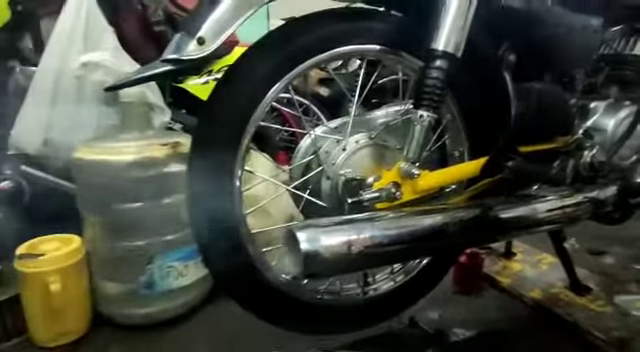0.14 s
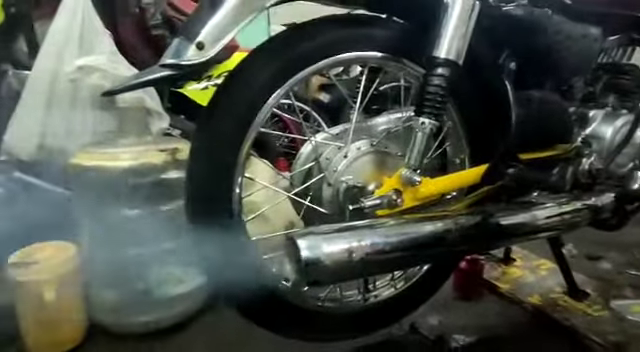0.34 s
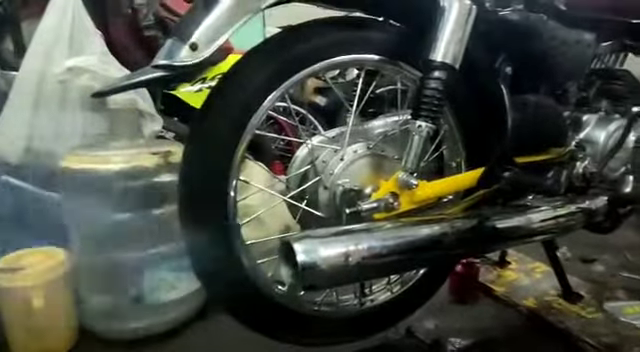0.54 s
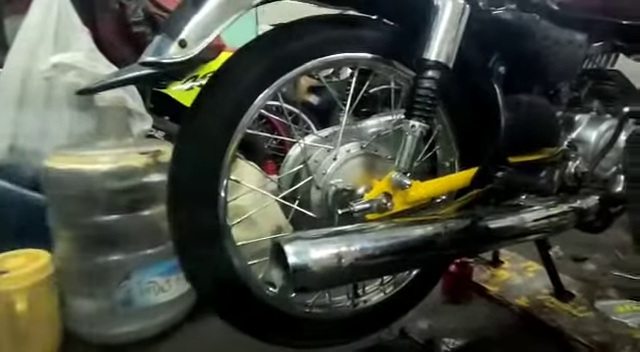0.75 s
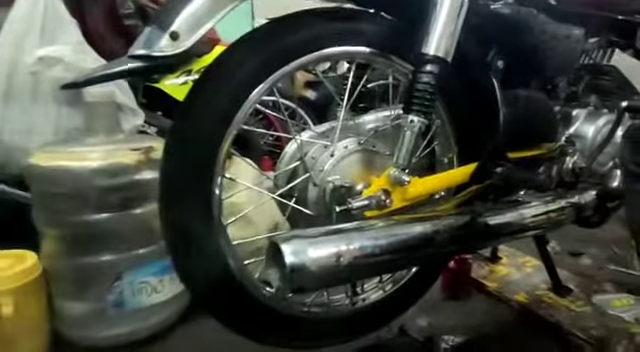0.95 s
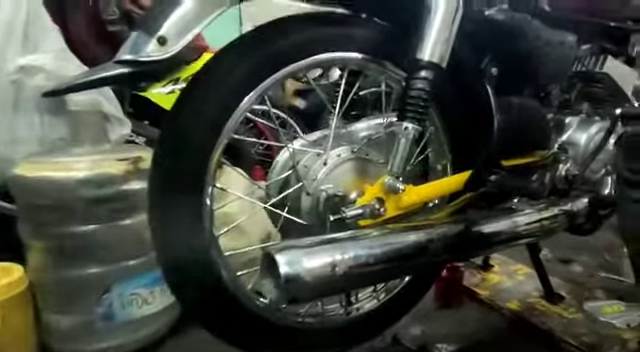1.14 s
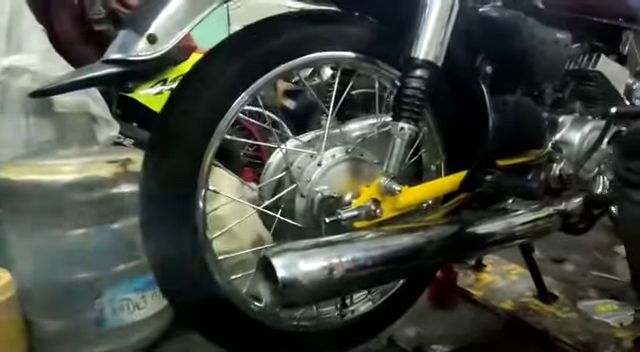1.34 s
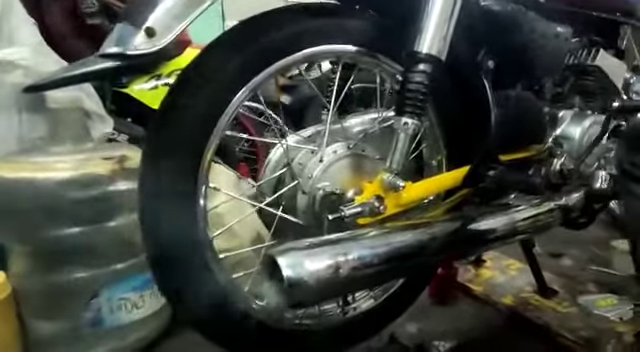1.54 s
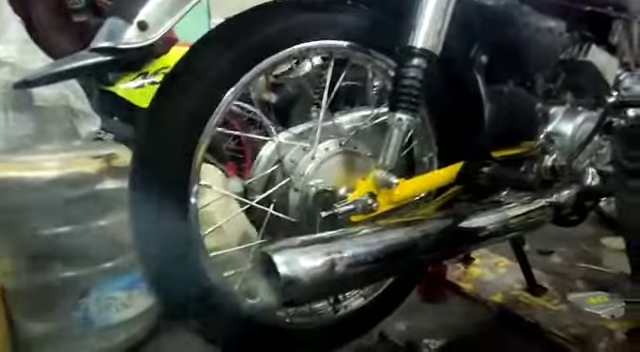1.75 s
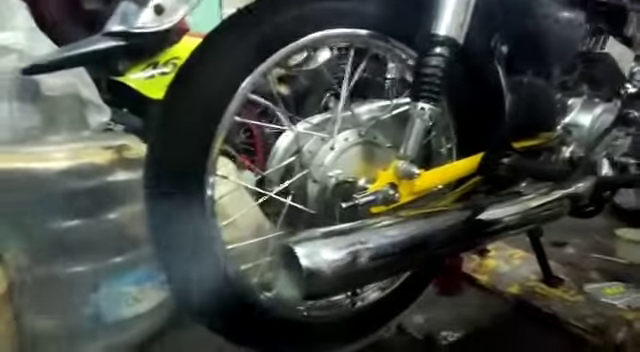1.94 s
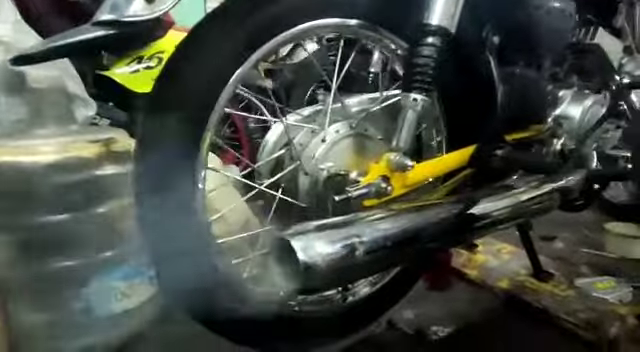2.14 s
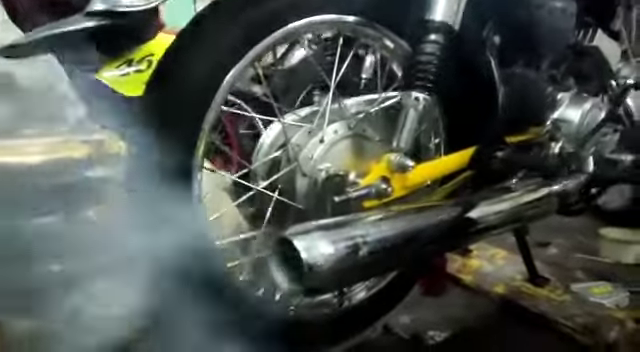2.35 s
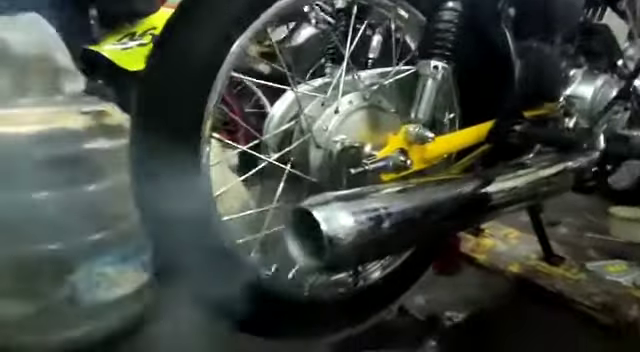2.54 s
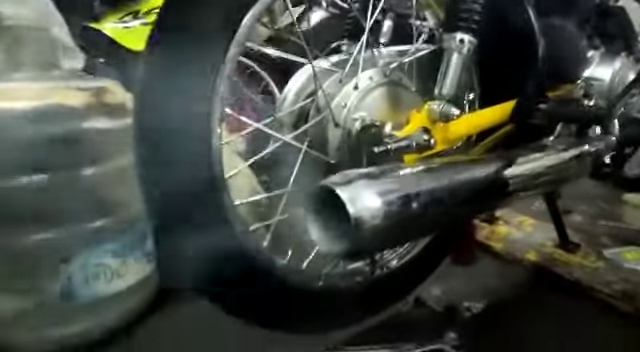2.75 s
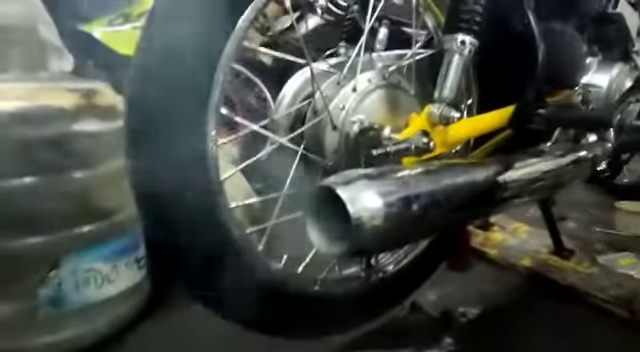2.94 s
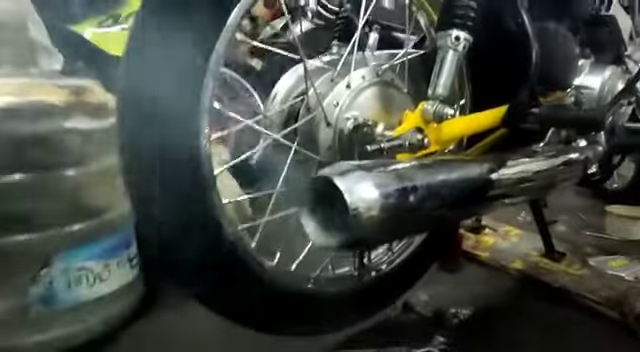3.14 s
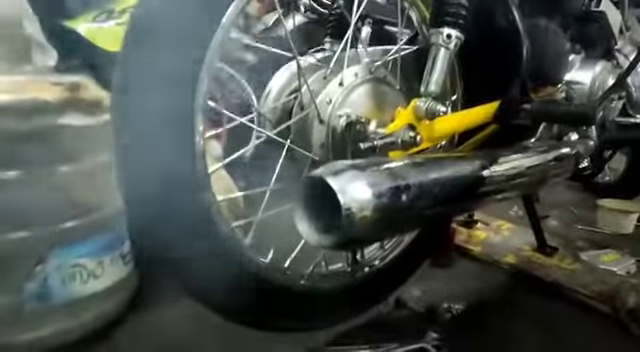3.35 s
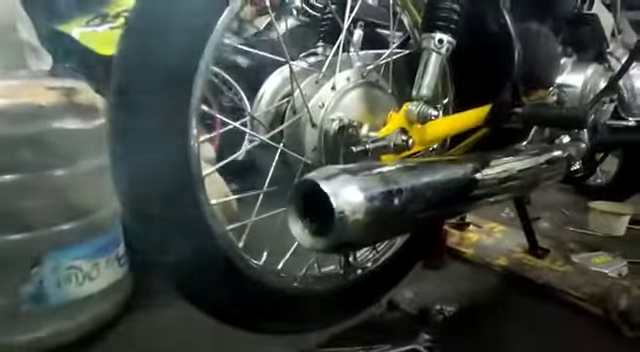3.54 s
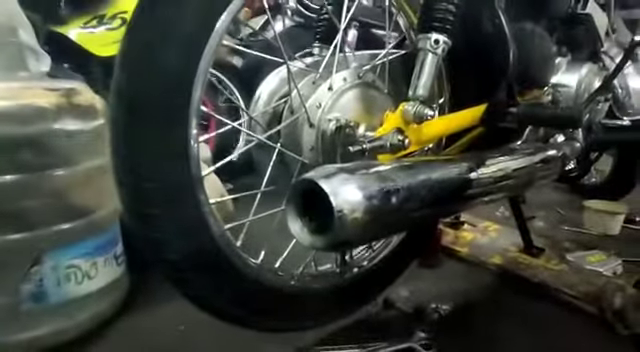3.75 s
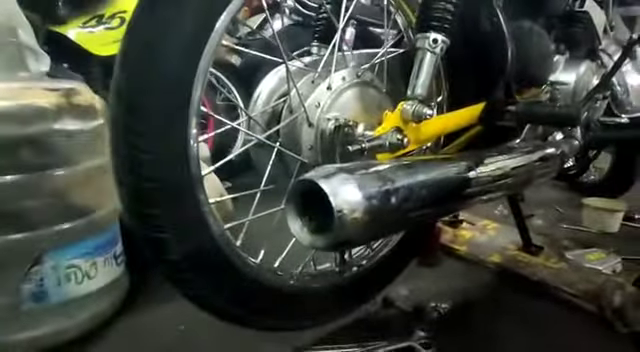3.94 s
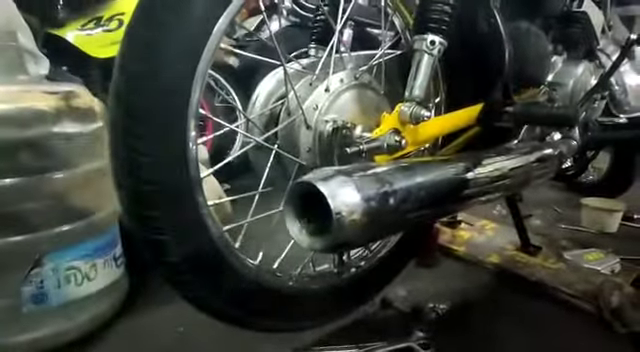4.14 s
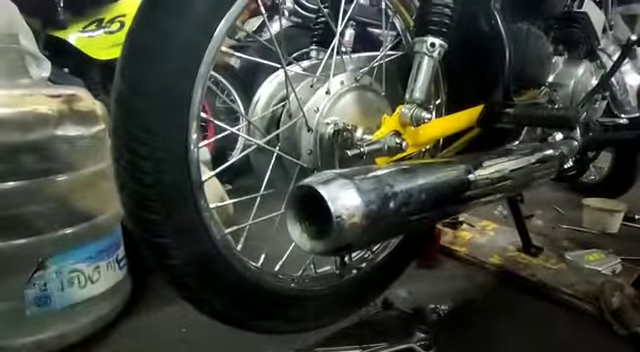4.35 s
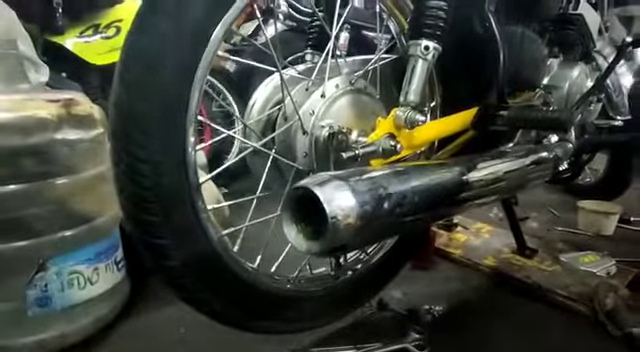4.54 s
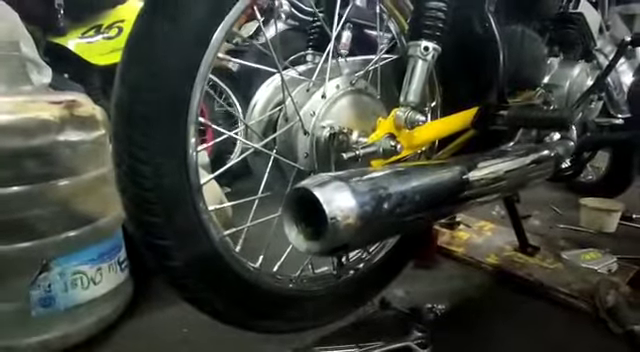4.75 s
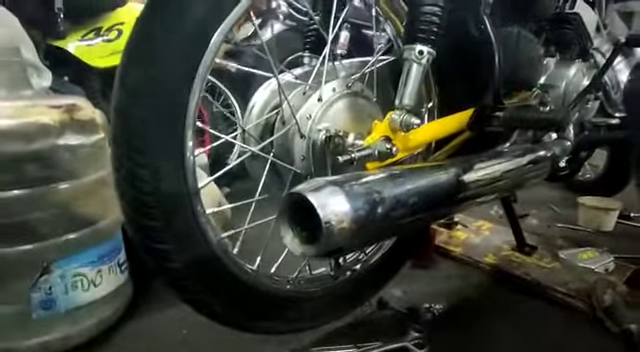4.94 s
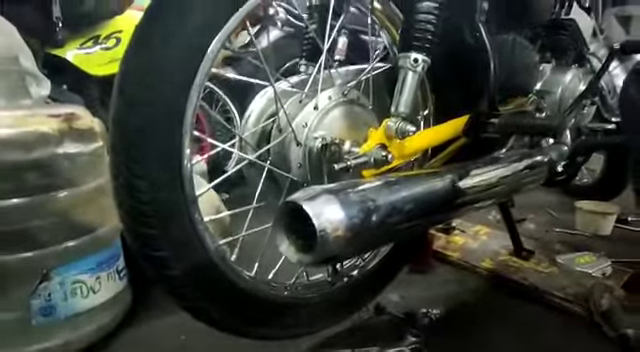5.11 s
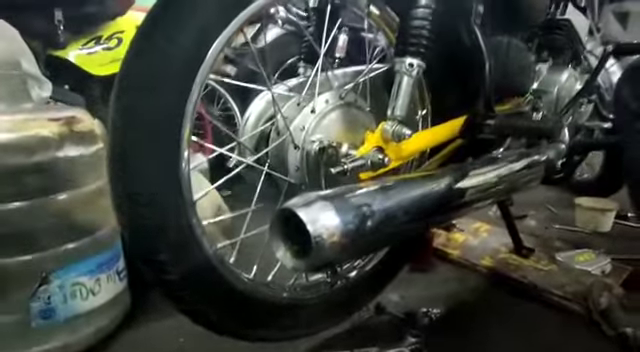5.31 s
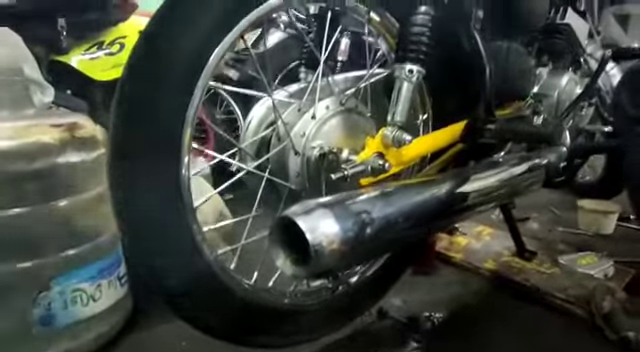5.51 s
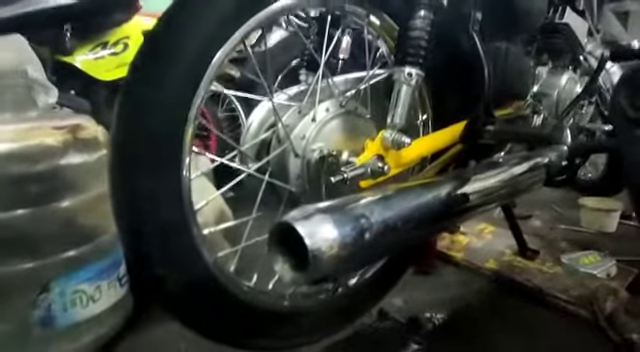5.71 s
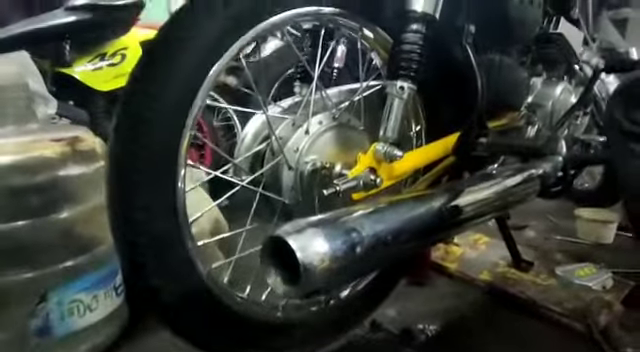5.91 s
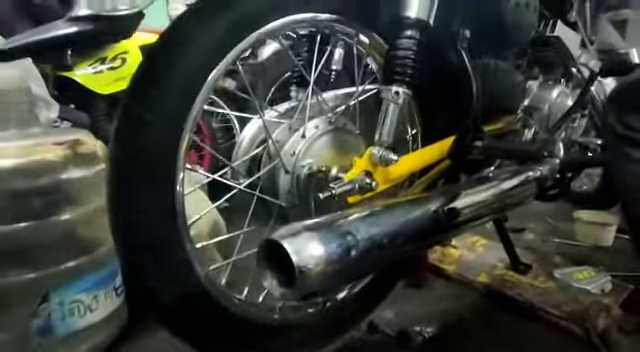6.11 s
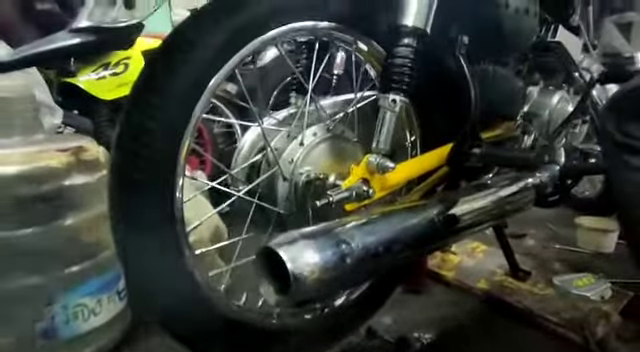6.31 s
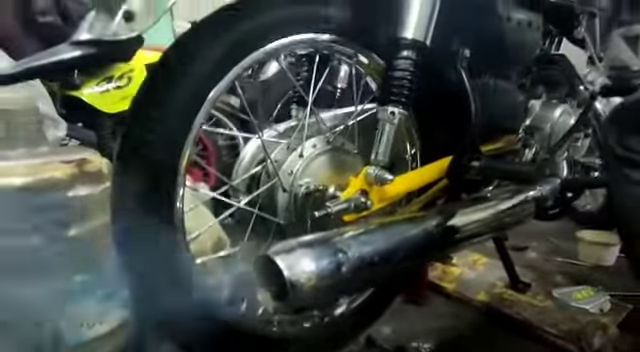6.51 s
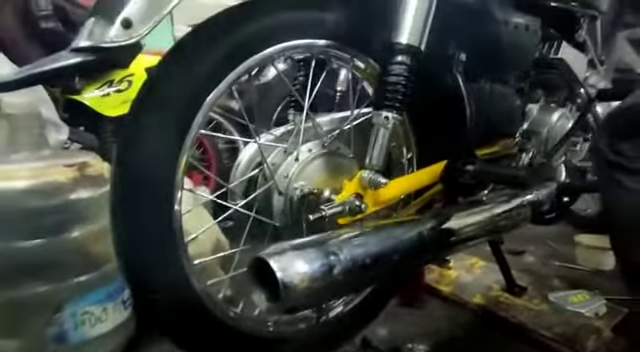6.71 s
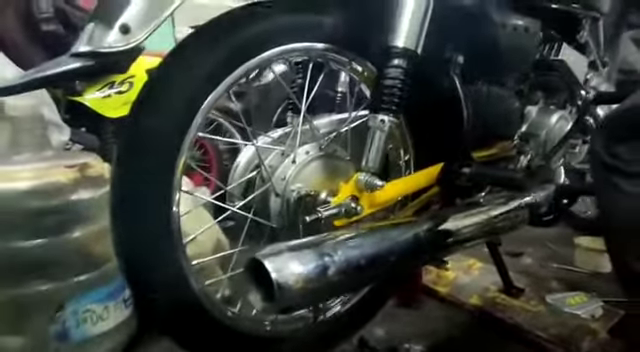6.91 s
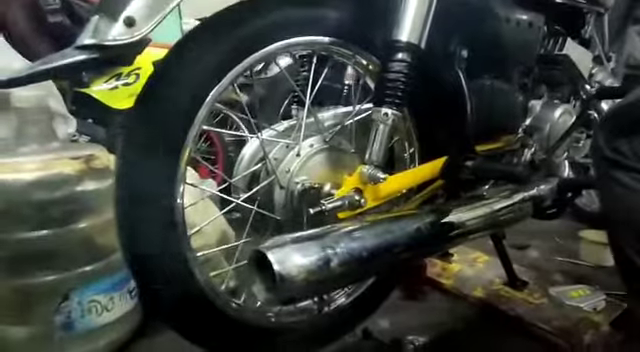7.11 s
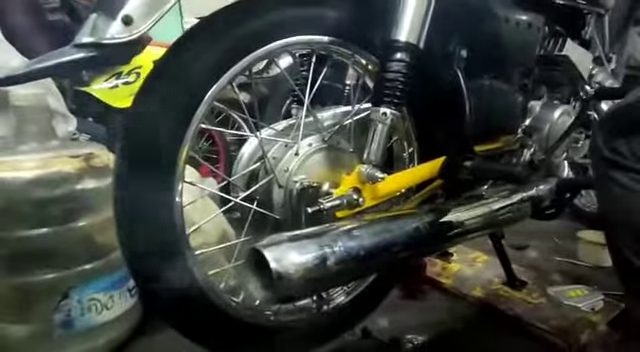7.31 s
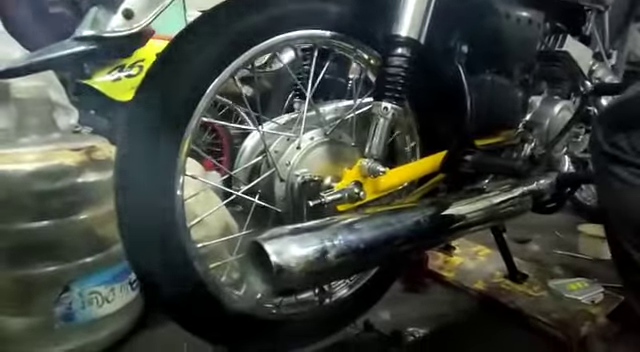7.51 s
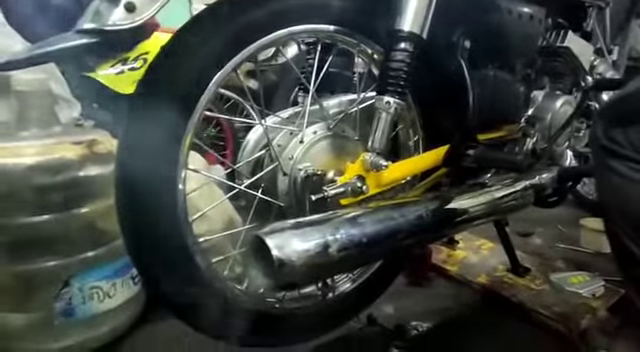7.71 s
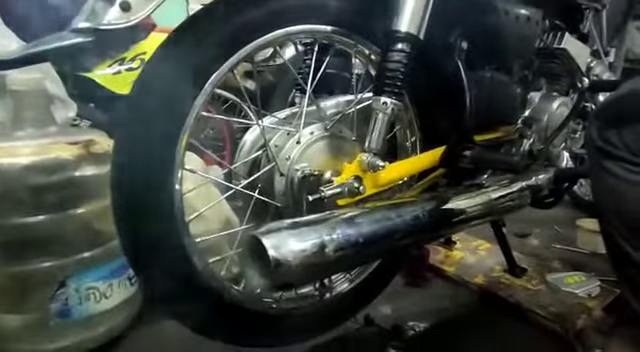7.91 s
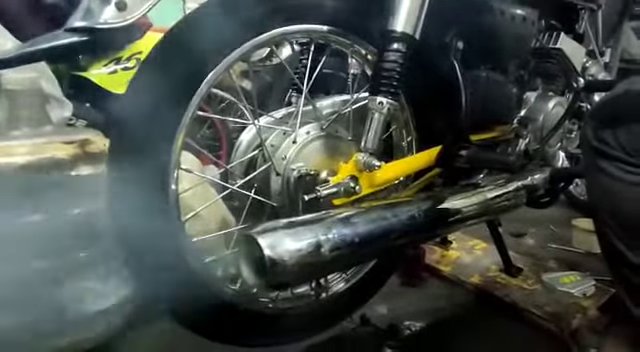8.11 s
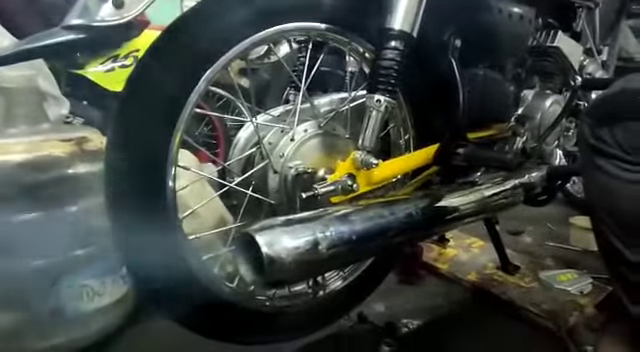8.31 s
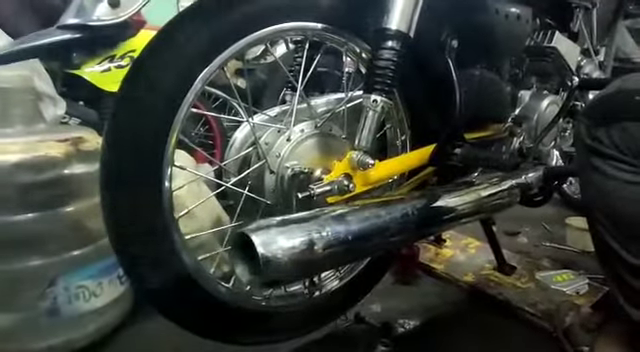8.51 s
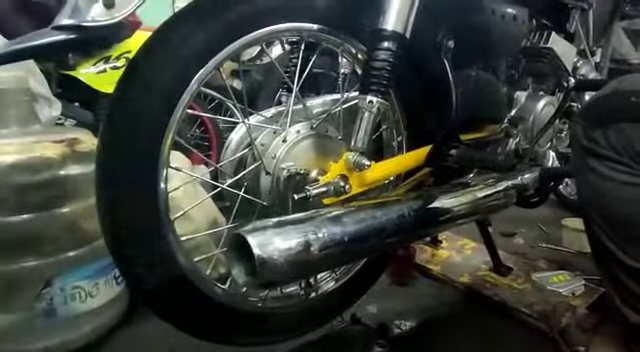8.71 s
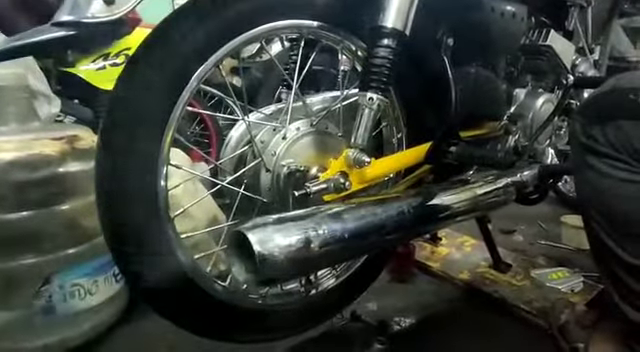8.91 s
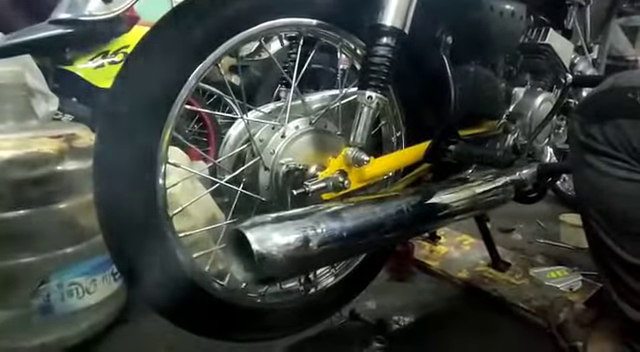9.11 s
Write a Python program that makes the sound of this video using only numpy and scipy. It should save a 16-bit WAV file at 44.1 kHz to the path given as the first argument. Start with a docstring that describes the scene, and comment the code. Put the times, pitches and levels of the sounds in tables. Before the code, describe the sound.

A small two-stroke motorcycle engine, heard close behind its exhaust, is revved in short crackling blips and winds down between them with stray pops.

```python
"""A small two-stroke motorcycle on its stand in a workshop, heard on a phone close behind the tail pipe.
Off throttle the piston pumps air through the pipe as a clean, falling drone over mechanical hiss.
In each blip every turn fires with a crack and a puff of gas; between blips stray turns fire alone.
This close, the exhaust jet buffets the two microphone ports with rumble and thumps,
and the phone's limiter holds down the peaks."""
import sys
import numpy as np
from scipy import signal
from scipy.fft import rfft, irfft
from scipy.io import wavfile
from scipy.ndimage import uniform_filter1d, minimum_filter1d

SR = 44100
rng = np.random.default_rng(int(sys.argv[2]) if len(sys.argv) > 2 else 0)


def digitize_waveform(pressure):
    """Quantize a signal to 16-bit integers and store it at the path in sys.argv[1].

    Rows of a 2-D input are taken as channels; values are limited to [-1, 1].
    """
    field = np.atleast_2d(pressure).T
    bounded = np.clip(field, -1, 1)
    quanta = np.round(bounded * 32767).astype(np.int16)
    wavfile.write(sys.argv[1], SR, quanta)


N = 408366


def undb(db):
    return 10 ** (np.asarray(db) / 20)


def at_rms(x, db):
    return x * undb(db) / np.sqrt(np.mean(x ** 2, axis=-1, keepdims=True))


def pan(left_minus_right_db):
    return undb(np.array([[left_minus_right_db], [-left_minus_right_db]]) / 2)


def band(x, hz, width):
    """Resonance with gain 1 at its centre."""
    return signal.lfilter(*signal.iirpeak(hz, hz / width, fs=SR), x)


def fade(x, t60):
    """Each impulse becomes a step that dies away."""
    return signal.lfilter([1], [1, -np.exp(-np.log(1000) / (t60 * SR))], x)


def wander(rate):
    """Random levels held 1 / rate s and smoothed twice; spread near 1."""
    hold = int(SR / rate)
    steps = np.repeat(rng.standard_normal(N // hold + 1), hold)
    return 1.3 * uniform_filter1d(uniform_filter1d(steps, hold), hold)[:N]


def noise(spectrum, alike_hz):
    """Coloured stereo noise, alike at both microphone ports below alike_hz, scaled by its 2.9 kHz band."""
    hz = np.maximum(np.fft.rfftfreq(N, 1 / SR), 1)
    mid, side = rfft(rng.standard_normal((2, N)))
    side = side * hz / np.hypot(hz, alike_hz)
    knot_hz, knot_db = np.transpose(spectrum)
    gain = undb(np.interp(np.log(hz), np.log(knot_hz), knot_db))
    out = irfft(gain * np.array([mid + side, mid - side]), N)
    return out / np.sqrt(np.mean(band(out, 2900, 3870) ** 2))


def pulses(turns, scatter_db):
    """One pulse a turn, shared between two samples, each with its own size."""
    at = np.flatnonzero(np.diff(np.floor(turns)) > 0)
    late = (np.ceil(turns[at]) - turns[at]) / (turns[at + 1] - turns[at])
    size = undb(scatter_db * rng.standard_normal(2000)[:len(at)])
    out = np.zeros(N)
    out[at], out[at + 1] = size * (1 - late), size * late
    return out


# Crankshaft speed in turns a second: t/s, speed/Hz
CRANK_SPEEDS = [(0.0, 103.9), (0.31, 94.26), (0.6, 141.2), (0.851, 131.9), (1.361, 110), (1.439, 108.5),
                (2.32, 79.23), (2.45, 80.18), (3.4, 59.18), (3.659, 91.4), (4.1, 75.76), (5.05, 54.93),
                (5.16, 53.92), (5.47, 47.44), (5.73, 99.1), (6.39, 79.37), (6.66, 137.1), (6.96, 123.8),
                (8.12, 82.83), (8.42, 139.2), (8.59, 130.8), (9.26, 104.6)]
def crank_speed():
    """Drag slows the shaft by a steady share a second; firing pulls it up along a rounded climb."""
    times, hz = np.transpose(CRANK_SPEEDS)
    place = np.interp(np.arange(N) / SR, times, np.arange(len(times)))
    row = np.minimum(place.astype(int), len(times) - 2)
    climb = np.sin(np.pi / 2 * (place - row)) ** 1.3
    share = np.where(hz[row + 1] > hz[row], climb, place - row)
    return hz[row] * (hz[row + 1] / hz[row]) ** share


# Balance behind the pipe, throttle shut: speed/Hz, rattle/dB, low modes/dB, upper modes/dB
COASTING_LEVELS = [(48, -41.5, -25, -22.5), (52.6, -41.5, -27.5, -21.5), (57.14, -39.5, -22.5, -18.5),
                   (64.25, -41.5, -19.5, -21), (73, -36.5, -20.5, -19.5), (75.85, -35, -22, -17),
                   (89.3, -34.5, -18.5, -18.5), (107, -26.5, -19, -17), (118.8, -25.5, -16.5, -18),
                   (122.6, -23, -15, -21.5), (136.4, -19.5, -10.5, -19.5), (147.7, -18.5, -22, -18)]
def coasting_levels(speed):
    """Rattle and drone grow broadly louder with speed: three level curves in dB."""
    speeds, *columns = np.transpose(COASTING_LEVELS)
    return [np.interp(speed, speeds, column) for column in columns]


def ring(puffs, modes, speed, waver_db):
    """Faster turns drive most high modes harder; neighbours alternate in sign, so their skirts add up."""
    out = 0
    for k, (hz, width, db, pan_db, slope_db) in enumerate(modes):
        drive = puffs * undb(db + slope_db * np.log2(speed / 100) + waver_db * wander(9))
        out = out + (-1) ** k * pan(pan_db) * band(drive, hz, width)
    return out


# Modes of pipe, silencer and shell:
# f/Hz, width/Hz, level/dB at 100 turns a second, left minus right/dB, gain/dB per doubling of speed
LOW_MODES = [(64.3, 60, -9.5, 1.5, 1.5), (114.5, 14, 0, -2.5, -4), (185.2, 38.6, 4.5, 0, -3),
             (246.7, 35.6, 3.5, 1, 1)]
UPPER_MODES = [(309, 6.4, -5.5, 6, 1.5), (381.6, 42.5, -8, 2, -2), (475, 44, -8.5, -6.5, 0.5),
               (562.3, 23.5, -5, 0.5, 17.5), (625, 33.7, -10, 1.5, 7), (731, 57, -8.5, -1, 14.5),
               (868, 33, -10, -2.5, 12.5), (978, 36, -11.5, 3.5, 13.5), (1111, 37, -11.5, -2, 24.5),
               (1267, 39, -16, 0, 27.5), (1380, 33, -18.5, 12, 13), (1525, 150, -24, -17, 21),
               (1694, 45, -18.5, -0.5, -5), (2102, 55, -14.5, 3.5, 29)]
def drone(turns, speed, low_db, upper_db):
    """The piston pumps even puffs down the pipe; their sharp edges ring the upper modes and vary more."""
    t = np.arange(N) / SR
    in_blip = sum((t > start) & (t < end) for start, end, *_ in THROTTLE_BLIPS)
    firing = uniform_filter1d(1. * in_blip, int(.018 * SR))
    puffs = pulses(turns, scatter_db=.7) * 100 / speed
    edge_turns = np.maximum.accumulate(turns + .008 * wander(60))
    edges = pulses(edge_turns, scatter_db=1.8) * 100 / speed
    low = ring(puffs, LOW_MODES, speed, waver_db=.9)
    upper = ring(edges, UPPER_MODES, speed, waver_db=2.6)
    # during a blip the low modes dip and the upper ones rise
    return (undb(low_db - 8 * firing) * low + undb(upper_db + 3.5 * firing) * upper) / np.std(low)


# Reflections inside the silencer, left path then right: delay/s, reflected share
BAFFLE_ECHOES = [
    [(.0031, .5), (.0072, .45)],
    [(.0032, .5), (.0071, .45)],
]
def silencer(stereo):
    """Allpass echoes spread each puff over the turn without colouring it."""
    out = []
    for channel, path in zip(stereo, BAFFLE_ECHOES):
        for delay, share in path:
            feedback = np.zeros(int(delay * SR) + 1)
            feedback[0], feedback[-1] = 1, -share
            channel = signal.lfilter(feedback[::-1], feedback, channel)
        out.append(channel)
    return np.array(out)


# Spectrum of the mechanical hiss: f/Hz, level/dB
RATTLE_SPECTRUM = [(150, -13), (400, -9), (800, -3.5), (1300, -3), (1900, -6.5), (2500, -6), (3400, -6.5),
                   (4800, -9.5), (5600, -7.5), (8000, -16)]
def rattle(turns, db):
    """Rings, chain, fins and intake: noise that throbs a little once a turn."""
    throb = 1 + .5 * np.exp(-(turns % 1) / .35)
    return undb(db) * throb * noise(RATTLE_SPECTRUM, alike_hz=900)


def jet_rumble(buffet):
    """Turbulence right on the microphone, unrelated at the two ports: faint throughout, strong in blips."""
    spectrum = [(15, -13.5), (60, 0), (120, 0), (200, -3.5), (500, -15.5), (2000, -58)]  # f/Hz, level/dB
    return (buffet + undb(-41)) * at_rms(noise(spectrum, alike_hz=5.5), 0)


# Runs of firing turns: start/s, end/s, gas/dB, extra gas at the onset/dB, crack/dB, buffeting/dB
THROTTLE_BLIPS = [(0.32, 0.618, -19.5, -3, 1, -14), (3.44, 3.47, -21, 7, 15, -14),
                  (3.486, 3.595, -18.5, 2, 8, -12), (3.621, 3.653, -32.5, 8, -14, -14.5),
                  (5.501, 5.707, -19.5, -5, 7.5, -17), (6.399, 6.67, -17, 4, 5, -18.5),
                  (8.135, 8.447, -18.5, 0, 1, -18.5)]
def blips(turns, speed):
    """Open throttle fires every turn, a bit early or late: gas envelope, fronts and buffeting envelope."""
    gas, fronts, buffet = np.zeros((3, N))
    ragged_turns = np.maximum.accumulate(turns + .07 * wander(70))
    swirl_db = 5 * wander(25)
    onset_s, closing_s, high_revs_hz = .036, .1, 120
    for start, end, gas_db, extra_db, crack_db, buffet_db in THROTTLE_BLIPS:
        a, b = int(start * SR), int(end * SR)
        t = np.arange(a, b) / SR
        # the throttle is rolled off at the end of a high-revving blip
        closing_db = -15 * np.clip(1 - (end - t) / closing_s, 0, 1) * (speed[b] > high_revs_hz)
        onset_db = extra_db * np.exp(-(t - start) / onset_s)
        slow_db = np.log2(100 / speed[a:b])  # cracks gain 1 dB per halving of speed
        beat = pulses(ragged_turns - ragged_turns[a] - .01, scatter_db=4.5)[a:b]
        gas[a:b] += undb(gas_db + onset_db + closing_db) * (.38 + 1.5 * fade(beat, t60=.045))
        gas[b:] += gas[b - 1] * fade(np.arange(N - b) == 0, t60=.18)
        fronts[a:b] += undb(crack_db + .5 * closing_db + slow_db) * beat
        buffet[a:b] += undb(buffet_db + swirl_db[a:b])
    return gas, fronts, uniform_filter1d(buffet, size=400)


def crack(fronts):
    """A firing front: one sharp swing, a short ring of the pipe mouth and a thud of the silencer."""
    def ring_out(x):
        mouth = band(x, 633, 280) + 2.5 * band(x, 446, 300) + .034 * band(x, 3900, 2500)
        return mouth + 2.8 * band(x, 210, 90)
    swing = ring_out(fronts) / ring_out(signal.unit_impulse(99)).max()
    return .18 * np.roll(swing, int(.0042 * SR)) - swing  # comes back inverted from the open end


# Spectrum of the gas at the pipe mouth: f/Hz, level/dB
GAS_SPECTRUM = [(150, -15.5), (400, -0.5), (900, -1.5), (1300, -11), (2500, -9), (4000, -11), (5200, -10.5),
                (8000, -12.5)]
def gas_rush(envelope):
    """Each firing blows a puff of noisy gas out of the pipe."""
    return envelope * noise(GAS_SPECTRUM, alike_hz=300)


def zing(speed):
    """A thin ring in the treble, as of a fin or bracket, that sings near 125 turns a second."""
    tone = band(rng.standard_normal((2, N)), hz=5885, width=40)
    return at_rms(tone, -28.5) * np.exp(-((speed - 125.2) / 3.7) ** 2)


# Slugs of exhaust that hit the microphone ports: t/s, level/dB, left minus right/dB, swing f/Hz
EXHAUST_SLUGS = [(0.506, 1, -2, 148), (0.522, 5, -6, 203), (0.751, -10, -3, 21.3), (1.402, -10, 8, 21.5),
                 (2.424, -5.5, -6, 21.4), (3.391, -7, -2, 21.7), (3.499, -29, -5, 160.6),
                 (5.467, -8, 4, 21.5), (5.539, -8, -15, 21.44), (5.693, -10, -6, 21.63),
                 (6.462, -15, -1, 105), (6.611, 1, 1, 145.2), (6.628, -6, 2, 88.82), (8.344, 0, -6, 150),
                 (8.361, 1, -4, 190), (8.43, -9, 4, 21.5)]
def gusts():
    """Each slug shoves the microphone membranes, which swing back."""
    out = 0
    for start, db, pan_db, hz in EXHAUST_SLUGS:
        pressure = fade(np.arange(N) == int(start * SR), t60=.092)
        rounded = fade(pressure, t60=.0043)
        swing = band(rounded, hz, width=65 + 2600 / hz)
        out = out + undb(db) * pan(pan_db) * swing / swing.max()
    return out


# Stray turns that fire alone: t/s, gas/dB, crack/dB, boom/dB
LONE_FIRINGS = [(1.3964, -17.5, 5.5, -17), (2.4254, -16, 9.5, -4.5), (2.592, -30, -17, -18),
                (3.3918, -15.5, 11, -3), (5.1084, -31, -17, -11), (5.2814, -30.5, -5.5, -9),
                (5.4436, -47, -9, -11), (5.463, -17, 17, -23), (9.1368, -27.5, -29, -23)]
def pops():
    """A lone firing puffs, cracks and leaves the silencer booming: gas envelope, fronts and boom."""
    puffs, fronts, kicks = np.zeros((3, N))
    for start, *levels_db in LONE_FIRINGS:
        at = int(start * SR)
        puffs[at], fronts[at], kicks[at] = undb(levels_db)
    boom_hz, width_hz = 205, 25
    boom = band(kicks, boom_hz, width_hz) * SR / (2 * np.pi * width_hz)
    return fade(puffs, t60=.16), fronts, boom


def scene():
    """The motorcycle from close behind the tail pipe, with its jet blowing on the microphone."""
    speed = crank_speed()
    turns = np.cumsum(speed) / SR
    rattle_db, low_db, upper_db = coasting_levels(speed)
    blip_gas, blip_fronts, buffet = blips(turns, speed)
    pop_gas, pop_fronts, boom = pops()
    firings = gas_rush(blip_gas + pop_gas) + crack(blip_fronts + pop_fronts) + boom
    pipe = silencer(drone(turns, speed, low_db, upper_db))
    bike = pipe + rattle(turns, rattle_db) + zing(speed) + firings
    bike[0] = np.roll(bike[0], 5)  # reaches the left port 5 samples later
    return bike + jet_rumble(buffet) + gusts()


def limiter(x, ceiling):
    """The phone looks ahead and turns both channels down around each peak."""
    gain = np.minimum(1, ceiling / (np.abs(x).max(0) + 1e-9))
    return x * uniform_filter1d(minimum_filter1d(gain, size=48), size=24)


def sizzle(dry, hz=12500, width=3260, gate_db=-53.5):
    """A faint top band gets through, behind a gate that opens only while it is loud."""
    top = signal.sosfilt(signal.butter(10, 10000, "high", fs=SR, output="sos"), dry)
    top = undb(-21) * band(band(top, hz, width), hz, width)
    rms = np.sqrt(np.abs(uniform_filter1d(np.mean(top ** 2, 0), size=700)))
    return top * np.clip(3 * (rms / undb(gate_db) - 1), 0, 1)


# Resonances added by the microphone ports, left then right: f/Hz, width/Hz, level/dB
PORT_RESONANCES = [
    [(5400, 67, -11), (6120, 120, 13), (6520, 464, 13), (6720, 490, 11.5)],
    [(5570, 100, -24.5), (5900, 250, -28), (7070, 160, 11.5), (7344, 213, 19)],
]
def record(dry):
    """The phone: shrill ports, treble that droops to a steep step, a limiter, and sizzle up to a top cut."""
    droop = signal.butter(14, 7720, fs=SR, output="sos")
    step = signal.ellip(12, .3, 100, 7960, fs=SR, output="sos")
    top_cut = signal.ellip(10, .3, 80, 15300, fs=SR, output="sos")
    heard = np.array([channel + sum(undb(db) * band(channel, hz, width) for hz, width, db in port)
                      for channel, port in zip(dry, PORT_RESONANCES)])
    heard = limiter(signal.sosfilt(droop, heard), ceiling=.86)
    heard = signal.sosfilt(step, heard) + sizzle(dry)
    return signal.sosfilt(top_cut, heard)


dry = scene()
out = record(dry)
digitize_waveform(out)
```